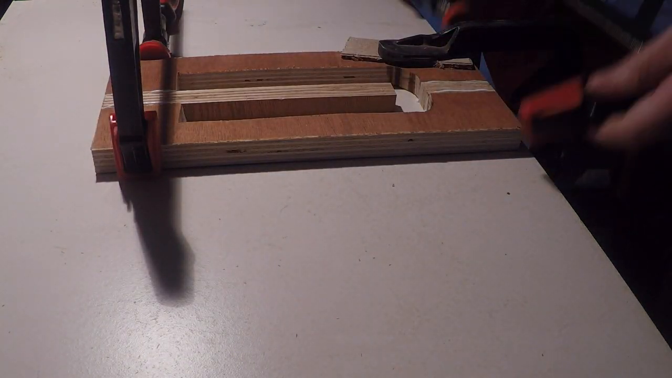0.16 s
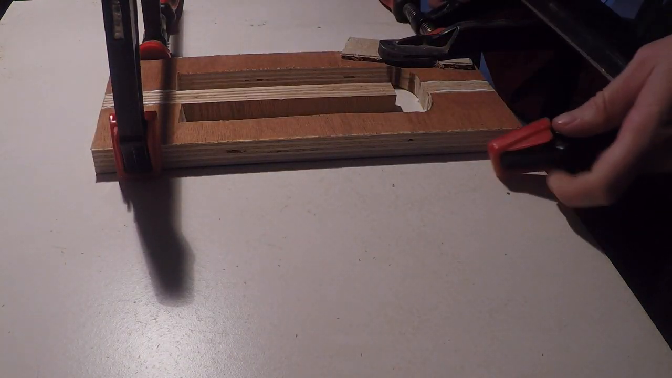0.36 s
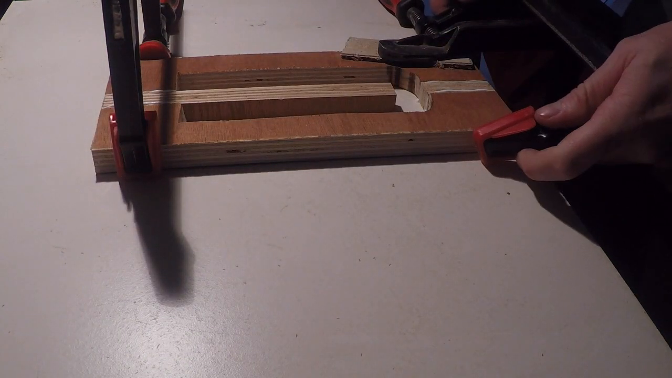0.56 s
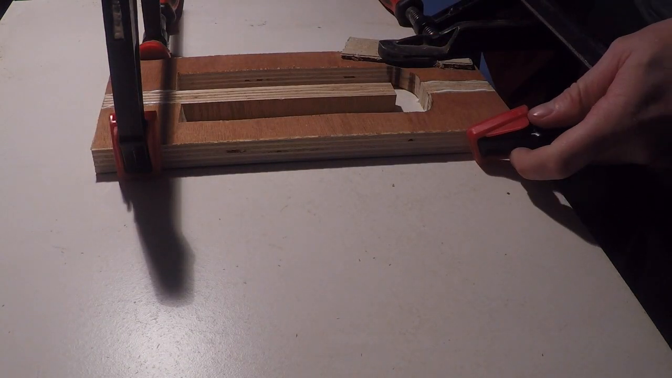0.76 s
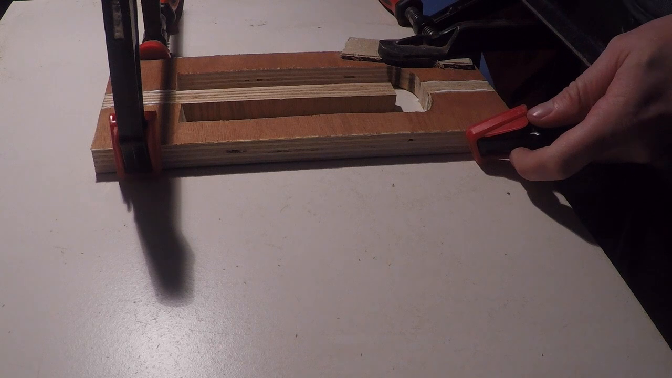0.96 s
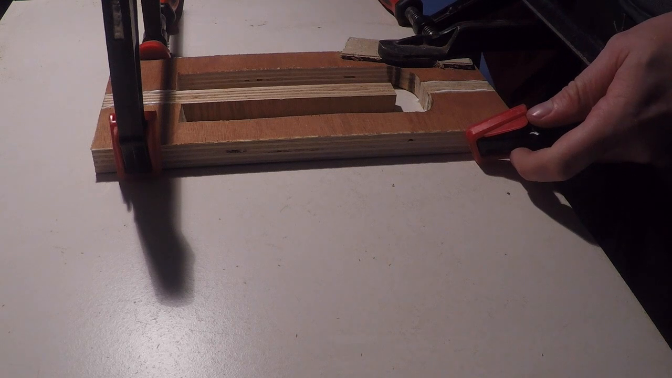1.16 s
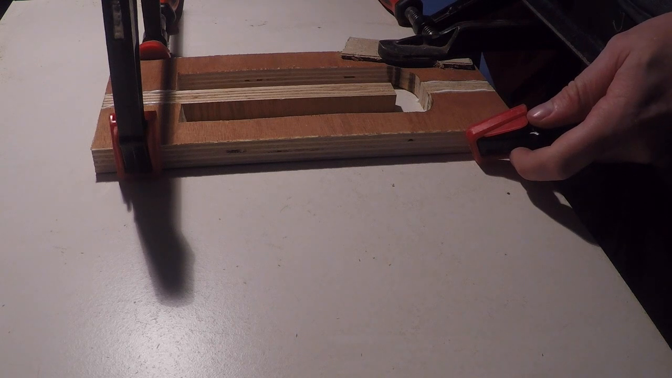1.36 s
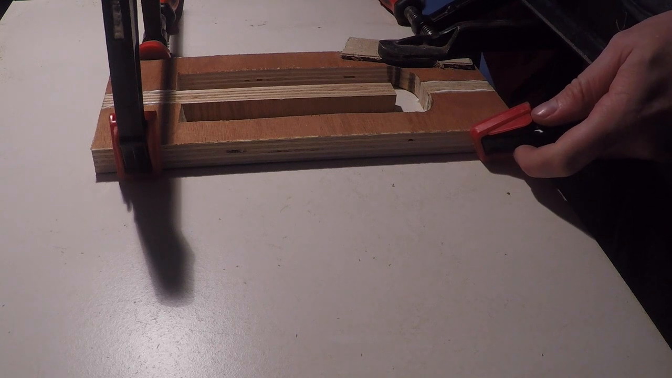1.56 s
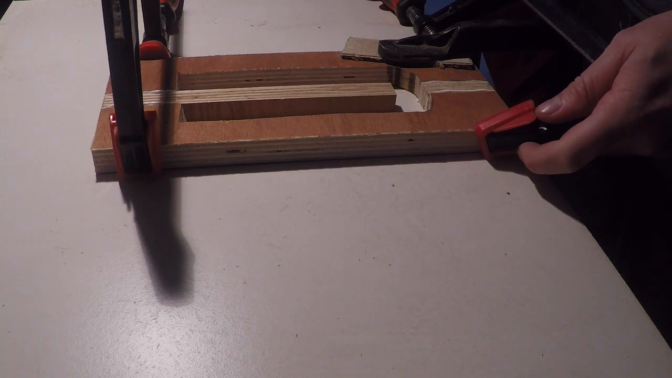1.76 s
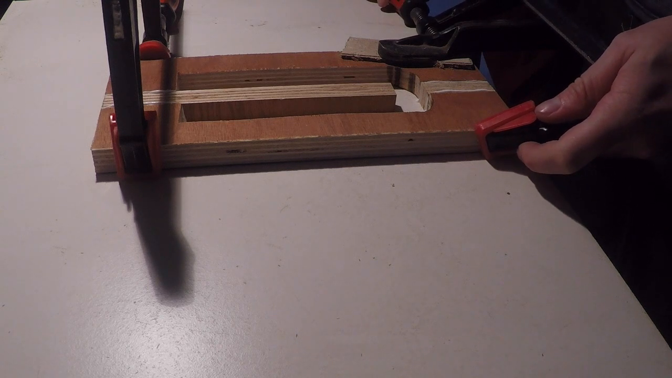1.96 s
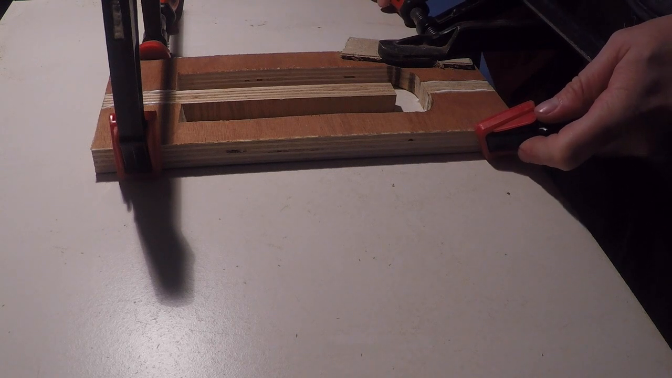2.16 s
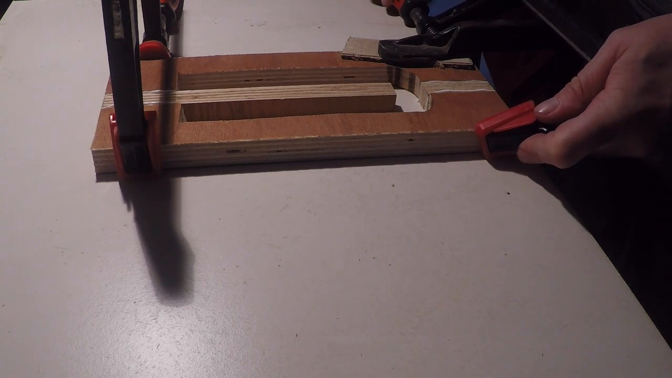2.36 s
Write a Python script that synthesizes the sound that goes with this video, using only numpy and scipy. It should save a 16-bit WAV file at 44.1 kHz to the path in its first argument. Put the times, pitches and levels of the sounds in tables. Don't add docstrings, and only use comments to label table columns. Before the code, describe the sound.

Close up in a quiet workshop, a metal clamp jingles and slides, bangs twice against a wooden workpiece on a bench, then only a faint brushing scrape and a last gentle knock over low rumble.

```python
import sys
import numpy as np
from scipy import signal
from scipy.fft import rfft, irfft
from scipy.io import wavfile
from scipy.ndimage import uniform_filter1d

SR = 44100
rng = np.random.default_rng(int(sys.argv[2]) if len(sys.argv) > 2 else 0)


def invert_db(level):
    return 10 ** (np.asarray(level, dtype=float) / 20)


def inscribe(sig):
    pcm = np.round(np.clip(np.atleast_2d(sig).T, -1, 1) * 32767)
    wavfile.write(sys.argv[1], SR, pcm.astype(np.int16))


N = 105840

# pitch_hz, width_hz, level_db
STEEL_MODES = [(1806, 38, -9.5), (2670, 85, -7), (2780, 81, -3), (3365, 50, -9), (3570, 63, -12.5),
               (4110, 75, -6), (4380, 32, -1.5), (4580, 71, -2.5), (4724, 105, -4.5), (5500, 140, -5),
               (6170, 220, -19), (6950, 73, -20.5), (8360, 90, -16.5), (9200, 90, -33)]
# pitch_hz, level_db, t60_s
BENCH_MODES = [(90.2, -15, 0.41), (114, -11.5, 0.058), (160.6, -1, 0.094), (247, 2, 0.15), (311, 5, 0.1),
               (385, 3.5, 0.18), (465.6, -1, 0.11), (567, 3.5, 0.097), (633.5, 2, 0.071), (729.4, -4, 0.17),
               (915, -10.5, 0.18), (1126, -5, 0.11), (1335, -15, 0.1), (1514, -12, .1)]


def evened(x):
    return x / np.sqrt(np.mean(x ** 2) + 1e-20)


def read(points, hz):
    f, value = np.transpose(points)
    return np.interp(np.log(hz + 1), np.log(f + 1), value)


def add(mix, s, sound):
    part = mix[round(s * SR):][:len(sound)]
    part += sound[:len(part)]


def coloured(x, points, outside_db=-70):
    hz = np.fft.rfftfreq(len(x), 1 / SR)
    inside = (hz >= points[0][0]) & (hz <= points[-1][0])
    gain_db = np.where(inside, read(points, hz), outside_db)
    return irfft(rfft(x) * invert_db(gain_db), len(x))


def level(strokes):
    t, gain = np.arange(N) / SR, np.zeros(N)
    for stroke in strokes:
        s, db = np.transpose(stroke)
        gain += invert_db(np.interp(t, s, db, -120, -120))
    return gain


def slow(top_hz):
    t = np.arange(N) / SR
    waves = [np.sin(2 * np.pi * (f * t + rng.random())) / np.sqrt(f) for f in np.geomspace(.2, top_hz, num=12)]
    return evened(sum(waves))


def grains(per_s, spread_db):
    hit, size, sign = rng.random((3, N))
    height = invert_db(-spread_db * np.log(np.maximum(size, .02)))
    return (hit < per_s / SR) * height * np.sign(sign - .5)


def steel_mode(hz, width_hz):
    t = np.arange(4000) / SR
    rise = np.minimum(t / 0.00047, 1)
    mode = np.exp(-np.pi * width_hz * t) * np.sin(2 * np.pi * hz * t) * rise
    return mode / np.linalg.norm(mode)


def ring(modes, share, contact_s):
    t = np.arange(SR // 3) / SR
    body = np.zeros(len(t))
    for k, (hz, db, t60) in enumerate(modes):
        body += (-1) ** k * invert_db(db - 60 * t / (t60 * share)) * np.sin(2 * np.pi * hz * t)
    push = np.hanning(max(round(2 * contact_s * SR), 1) + 2)
    return signal.oaconvolve(body, push / push.sum())


def slide():
    # start_s, level_db
    slide_strokes = [
        [(0, -49.5), (.062, -48.5), (.12, -46.5), (.16, -38.5), (.2, -55.5), (.225, -64), (.31, -63),
         (.44, -64), (.53, -54)],
        [(1.0, -69), (1.1, -72), (1.17, -70), (1.2, -52.5), (1.225, -61), (1.27, -75), (1.3, -89), (1.38, -73),
         (1.43, -77)],
        [(1.72, -74), (1.745, -65.5), (1.79, -74), (1.83, -75)],
    ]
    # pitch_hz, level_db per Hz
    rub_tone = [(300, 4), (1200, -10), (2500, -7.5), (4500, 4.5), (6000, -9.5), (9000, -21.5), (14000, -70)]
    rattles_per_s, spread_db, rattle_share = 110, 3.5, .6
    stroke, bar = level(slide_strokes), np.zeros(N)
    for hz, width_hz, db in STEEL_MODES:
        rattle = evened(grains(rattles_per_s, spread_db))
        taps = rattle_share * rattle + (1 - rattle_share) * rng.standard_normal(N)
        bar += invert_db(db) * signal.oaconvolve(taps * stroke, steel_mode(hz, width_hz))[:N]
    grit = evened(grains(1500, 3.5)) + rng.standard_normal(N)
    hiss = stroke * evened(coloured(grit, rub_tone))
    return invert_db(-6) * bar + invert_db(-4) * hiss


def knocks():
    # start_s, peak_db, favoured pitch_hz, ring_share
    knock_hits = [(0.126, -41.5, 407, 0.27), (.155, -39, 400, 0.22), (.229, -13, 562, 0.14),
                  (.237, -18, 390, 0.83), (0.239, -24.5, 138, 0.92), (.251, -24, 430, 1.7),
                  (.268, -49, 380, 2.5), (.336, -11, 480, 0.21), (.342, -10, 300, 0.12),
                  (.345, -12, 270, 0.136), (.348, -6, 300, 0.12), (.354, -6, 320, 0.065),
                  (.365, -14, 400, 0.38), (.375, -20, 400, 0.66), (.347, -22, 1150, 0.26),
                  (.358, -29, 990, 0.63), (.374, -30.5, 1140, .4), (0.38, -21, 420, 0.28),
                  (.39, -18.5, 400, 0.3), (.507, -26, 204, 0.8), (0.525, -20.5, 105, 0.39),
                  (.542, -23.5, 670, 0.49), (.551, -18, 420, 0.6), (0.554, -23, 112, 0.35),
                  (.559, -19.5, 385, 0.16), (.565, -19.5, 390, 0.15), (0.593, -30, 105, 0.57),
                  (0.463, -30.5, 476, 0.73), (.478, -31, 370, 1.1), (1.801, -35.5, 300, 0.31),
                  (1.809, -39, 92, 0.66), (1.818, -45, 330, 0.59), (1.85, -32.5, 406, 1.9),
                  (1.866, -43.5, 598, 0.81), (1.868, -42, 1240, 0.42), (1.875, -45, 1500, 0.45),
                  (1.845, -45.5, 1090, 0.67), (1.86, -35, 162, 1.7), (0.999, -50, 378, 0.65),
                  (.86, -53, 190, 0.87), (1.879, -38, 197, 0.23), (0.605, -36, 345, 0.59)]
    spot_octaves, detune, contact_cycles = 0.69, 0.035, 0.21
    out = np.zeros(N)
    spots = rng.uniform(-1, 1, (len(knock_hits), len(BENCH_MODES)))
    for (s, db, near_hz, share), spot in zip(knock_hits, spots):
        modes = []
        for (hz, mode_db, t60), shift in zip(BENCH_MODES, spot):
            off_spot_db = 6 * (np.log2(hz / near_hz) / spot_octaves) ** 2
            modes.append((hz * (1 + detune * shift), mode_db - off_spot_db, t60))
        contact_s = contact_cycles / near_hz
        body = ring(modes, share, contact_s)
        add(out, s - contact_s, invert_db(db) * body / abs(body).max())
    return out


def drag():
    # start_s, level_db
    drag_strokes = [
        [(0, -55), (.03, -63), (.1, -63), (.22, -80)],
        [(.43, -71), (.458, -58), (.47, -44), (.5, -34), (.53, -30), (.565, -49), (.585, -37.5), (.615, -64),
         (.66, -66)],
        [(1.78, -47.5), (1.8, -52), (1.835, -47.5), (1.86, -46), (1.92, -51.5), (1.97, -81)],
    ]
    body = ring(BENCH_MODES, 0.31, 0.00092)
    slips = evened(grains(980, 3.8)) * level(drag_strokes)
    return invert_db(0.5) * signal.oaconvolve(slips, body / np.linalg.norm(body))[:N]


def clicks():
    # start_s, peak_db, burst_s, brightness in db per octave
    jaw_clicks = [(0.022, -42.5, 0.0079, 1.5), (.066, -33, 0.005, 2), (.095, -40.5, 0.0042, 0.5),
                  (0.126, -31, 0.0097, 1.5), (.192, -36, 0.0044, 0.5), (.157, -35, 0.0024, -26),
                  (.164, -34.5, 0.0034, 0), (.2285, -18.5, 0.0029, -3), (0.233, -25, 0.0086, -5),
                  (.327, -37.5, 0.0044, 5.5), (.336, -24, 0.0059, -8), (0.344, -25.5, 0.0034, -3.5),
                  (0.347, -40, 0.0036, -5), (0.374, -39, 0.0019, -3), (0.487, -42, 0.012, 0),
                  (.5405, -29.5, 0.0013, -4), (.542, -21, 0.0058, -6.5), (.545, -24, 0.012, -6.5),
                  (0.55, -25, 0.0055, -8.5), (1.22, -52, 0.0021, 3.5), (1.841, -41, 0.0051, -2),
                  (1.864, -42, 0.0091, -7.5), (1.87, -47, 0.0053, -2.5), (1.877, -44, 0.0064, -9.5)]
    # pitch_hz, level_db
    snap_tone = [(600, -10), (1300, -10.5), (2000, -3), (2800, -2), (4500, -3.5), (7000, -9.5),
                 (10000, -25), (15200, -34)]
    rise_s, ring_db, lead = .0005, -17, 88
    out, t = np.zeros(N), np.arange(4096) / SR
    draws = rng.standard_normal((len(jaw_clicks), 2, len(t)))
    for (s, db, burst_s, tilt_db), (noise, chatter) in zip(jaw_clicks, draws):
        ragged = invert_db(2 * evened(uniform_filter1d(chatter, 40)))
        shape = np.exp(-t / burst_s) * np.minimum(t / rise_s, 1) * ragged
        burst = noise * shape
        colour = [(hz, d + tilt_db * np.log2(hz / 3000)) for hz, d in snap_tone]
        crack = evened(coloured(np.roll(burst, lead), colour, -110)) * np.sqrt(np.mean(shape ** 2))
        add(out, s - lead / SR, invert_db(db) * .5 * crack * np.minimum(t / .002, 1))
        bar = sum(invert_db(d + 5.55 * u) * steel_mode(hz, w) for (hz, w, d), u in zip(STEEL_MODES, chatter))
        add(out, s, invert_db(db + ring_db + 3.1 * tilt_db) * signal.oaconvolve(burst, bar))
    return out


def lever():
    # pitch_hz, level_db, t60_s
    lever_modes = [(4480, -4, .08), (4570, -5, .15), (4650, -2, .1), (4720, -3, .14), (4800, -2, .13),
                   (4900, -3, .1), (5020, -5, .06)]
    ping_s, ping_db = 1.842, -61
    squeal_s, squeal_length_s, squeal_hz, squeal_db = 1.22, .07, 13700, -75
    out = np.zeros(N)
    burst = rng.standard_normal(600) * np.exp(-np.arange(600) / SR / .005) / 4
    add(out, ping_s, invert_db(ping_db) * signal.oaconvolve(ring(lever_modes, 1, 0), burst))
    t = np.arange(round(squeal_length_s * SR)) / SR
    wobble = np.cumsum(uniform_filter1d(rng.standard_normal(SR), 40))[:len(t)] * .3
    squeal = np.hanning(len(t)) * np.sin(2 * np.pi * squeal_hz * t + wobble)
    add(out, squeal_s, invert_db(squeal_db) * squeal)
    return out


def tinks():
    # start_s, level_db, pitch_hz, t60_s
    small_parts = [(.005, -56, 8400, .04), (0.0203, -48, 5390, 0.049), (.031, -59, 8400, .03),
                   (0.046, -54, 8500, 0.041), (0.068, -51, 7400, 0.024), (.095, -46, 4230, 0.045),
                   (.128, -49, 8500, 0.032), (.129, -47, 6240, 0.037), (0.159, -50, 6950, 0.073),
                   (.185, -57, 8600, .06), (.19, -36.5, 5390, 0.067), (0.228, -40.5, 6750, 0.038),
                   (.49, -58, 6800, .04), (1.196, -50, 4500, .04), (1.22, -42, 4010, 0.03),
                   (1.221, -48, 2740, .04), (1.388, -63, 6300, .05), (1.84, -53, 2170, 0.049),
                   (1.84, -66, 6360, 0.015)]
    out, t = np.zeros(N), np.arange(4096) / SR
    for (s, db, hz, t60), (split, turn) in zip(small_parts, rng.random((len(small_parts), 2))):
        partner_hz = hz * (1.01 + .02 * split)
        pair = np.sin(2 * np.pi * hz * t) + .6 * np.sin(2 * np.pi * (partner_hz * t + turn))
        add(out, s, invert_db(db - 60 * t / t60) * np.minimum(t / .001, 1) * pair)
    return out


def scrape():
    # start_s, resonance_hz, level_db
    scrape_path = [(1.175, 4520, -64), (1.195, 4400, -58), (1.22, 3970, -61.5), (1.255, 3940, -59),
                   (1.275, 4100, -83), (1.33, 4100, -81), (1.36, 4060, -73), (1.41, 4230, -80),
                   (1.45, 4200, -83)]
    width_hz, spread_db = 700, 3
    s, hz, db = np.transpose(scrape_path)
    turn = np.exp(2j * np.pi * np.cumsum(np.interp(np.arange(N) / SR, s, hz)) / SR)
    r = np.exp(-np.pi * width_hz / SR)
    grit = evened(grains(1100, spread_db)) + .5 * rng.standard_normal(N)
    resonant = (turn * signal.lfilter([1 - r], [1, -r], grit / turn)).real
    return level([np.transpose([s, db])]) * evened(resonant)


def squeak():
    # start_s, pitch_hz, level_db
    squeak_path = [
        [(.045, 735, -70), (.075, 728, -58), (.135, 714, -54.5), (.195, 706, -56), (.222, 705, -62)],
    ]
    s, hz, db = np.transpose(squeak_path[0])
    pitch_hz = np.interp(np.arange(N) / SR, s, hz) + 6 * slow(60)
    turns = np.cumsum(pitch_hz) / SR
    rough = invert_db(1.7 * slow(40))
    return np.sqrt(2) * level([np.transpose([s, db])]) * rough * np.sin(2 * np.pi * turns)


def brush():
    # start_s, level_db
    brush_strokes = [
        [(1.17, -67), (1.19, -52), (1.27, -51.5), (1.33, -56), (1.39, -56), (1.42, -70), (1.48, -96)],
    ]
    # pitch_hz, level_db per Hz
    brush_tone = [(250, -4), (400, 7), (600, 1.5), (1000, -5), (2000, -9), (4300, -15), (6000, -21),
                  (14000, -34)]
    fibres = evened(grains(4000, 2.5)) + rng.standard_normal(N)
    return level(brush_strokes) * invert_db(-4) * evened(coloured(fibres, brush_tone))


def room(x):
    # pitch_hz, t60_s
    room_decay = [(150, 0.43), (500, 0.36), (1400, 0.26), (2700, 0.57), (5000, 0.68), (9000, 0.32),
                  (15000, 0.16)]
    t = np.arange(SR) / SR
    taps = rng.standard_normal(SR) * np.clip((t - .004) / 0.0071, 0, 1)
    hz, t, z = signal.stft(taps, SR, nperseg=256)
    fade = invert_db(-60 * t / read(room_decay, hz)[:, None])
    tail = signal.istft(z * fade, SR, nperseg=256)[1]
    return signal.fftconvolve(x, tail / np.linalg.norm(tail))[:N]


def background():
    # pitch_hz, level_db per Hz
    air_tone = [(65, -63), (110, -6), (192, -1.5), (213, -5.5), (247, -10.5), (373, -7.5), (542, -17),
                (2720, -21.5), (15500, -33.5)]
    # pitch_hz, level_db per Hz
    rumble_tone = [(12, -22), (22, -8), (36, -3), (50, -1), (65, -9), (80, -12), (100, -20), (130, -26)]
    # pitch_hz, level_db, waver_hz, waver_db
    machine_hum = [(26.9, -42, .2, 1.5), (45, -45.5, 1.2, 2.5)]
    out = invert_db(-61 + .8 * slow(8)) * evened(coloured(rng.standard_normal(N), air_tone))
    out += invert_db(-47) * evened(coloured(rng.standard_normal(N), rumble_tone))
    for hz, db, waver_hz, waver_db in machine_hum:
        turns = np.cumsum(hz + waver_hz * slow(2.1)) / SR + rng.random()
        out += np.sqrt(2) * invert_db(db + waver_db * slow(3.32)) * np.sin(2 * np.pi * turns)
    return out


def scene():
    steel = slide() + squeak() + clicks() + lever() + brush() + tinks() + scrape()
    wood = knocks() + drag()
    wet = room(invert_db(-8.5) * steel + invert_db(-17) * wood)
    return (steel + wood + wet + background())[None]


def band_limit(x):
    return signal.sosfilt(signal.butter(12, 15640, fs=SR, output="sos"), x)


def record(dry):
    low_pass = signal.firwin(401, 15350, window=("kaiser", 9), fs=SR)
    mix = signal.oaconvolve(dry, low_pass[None], "same")
    return band_limit(mix)


dry = scene()
out = record(dry)
inscribe(out)
```